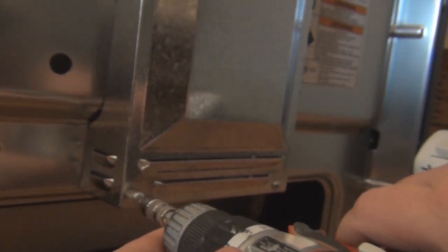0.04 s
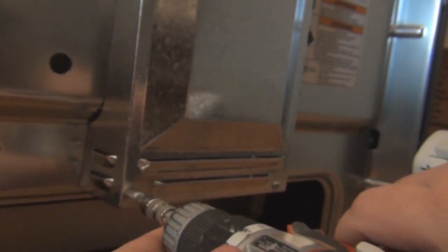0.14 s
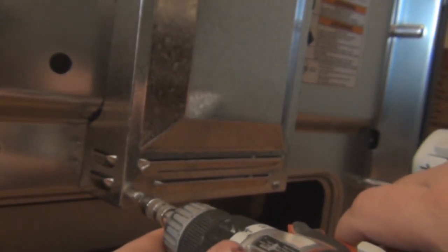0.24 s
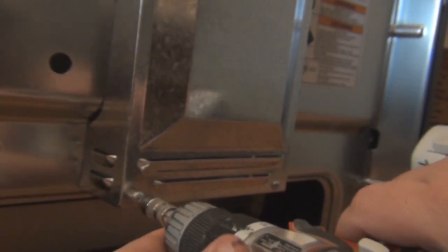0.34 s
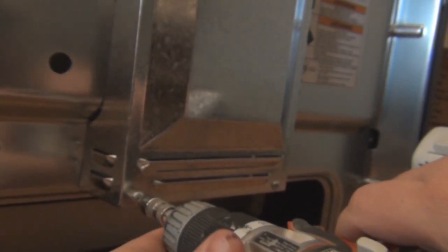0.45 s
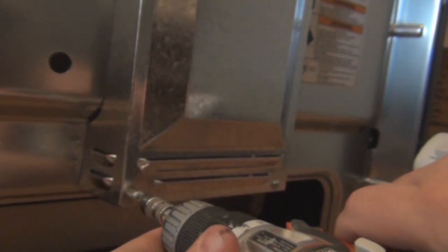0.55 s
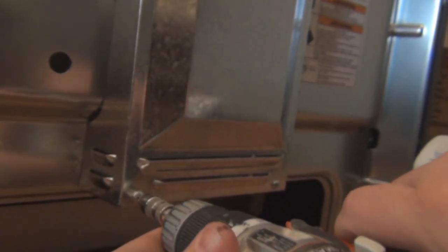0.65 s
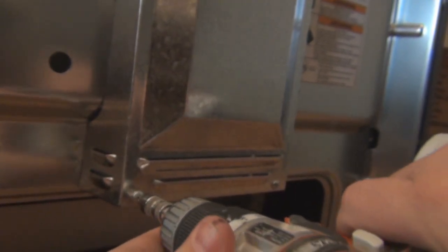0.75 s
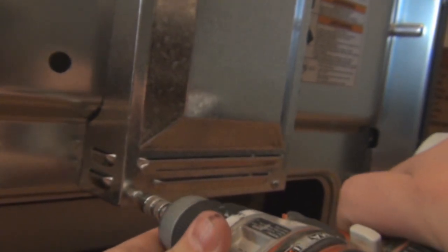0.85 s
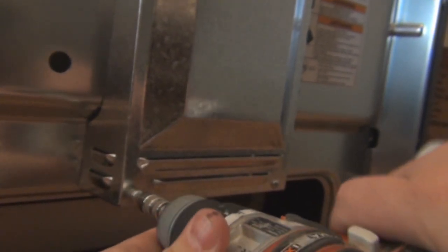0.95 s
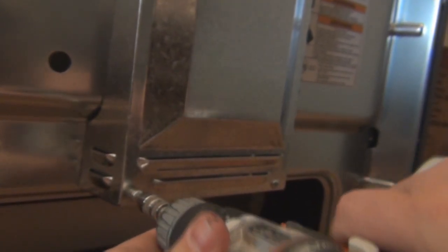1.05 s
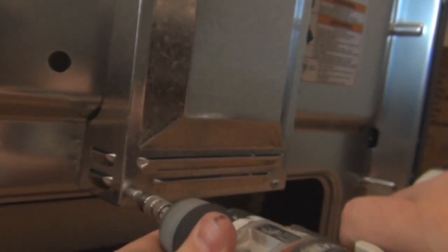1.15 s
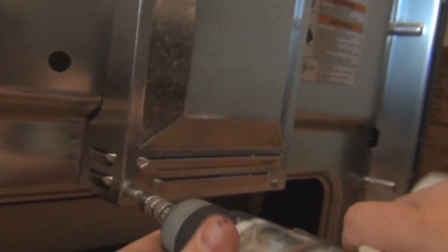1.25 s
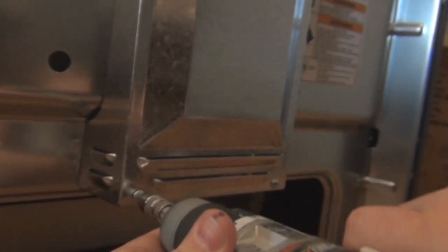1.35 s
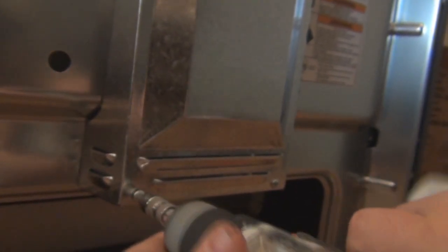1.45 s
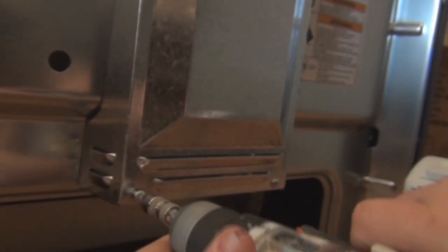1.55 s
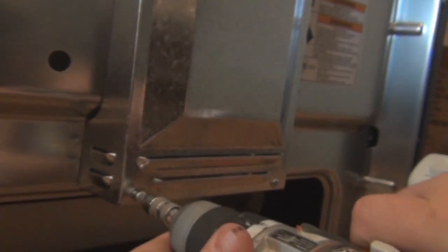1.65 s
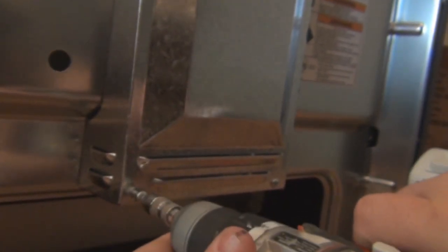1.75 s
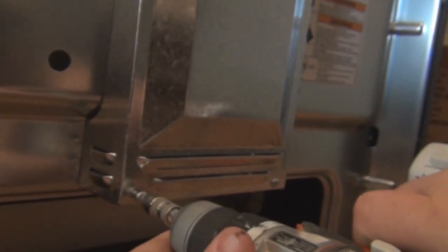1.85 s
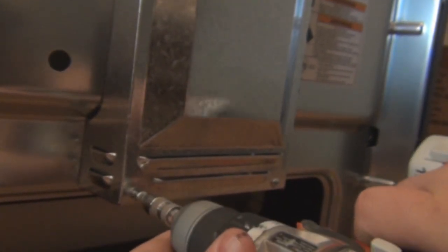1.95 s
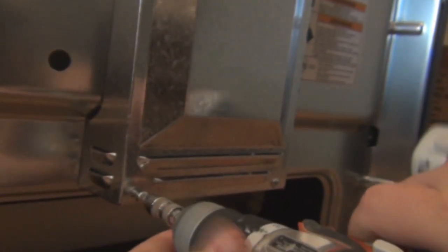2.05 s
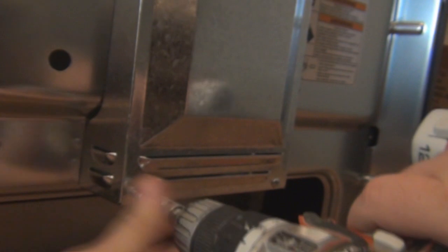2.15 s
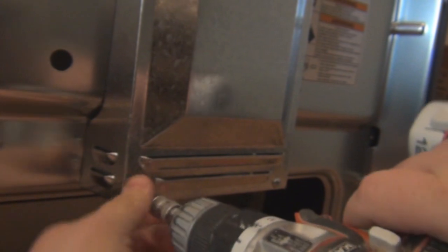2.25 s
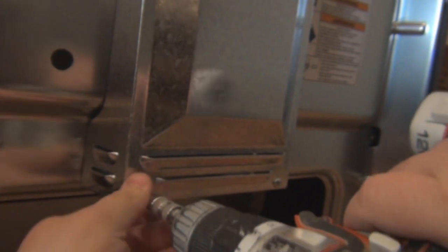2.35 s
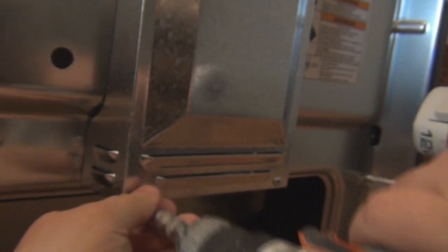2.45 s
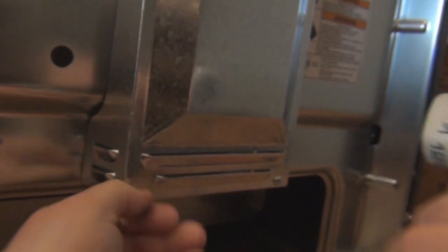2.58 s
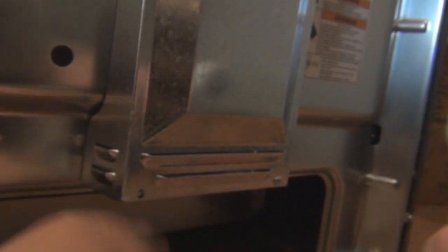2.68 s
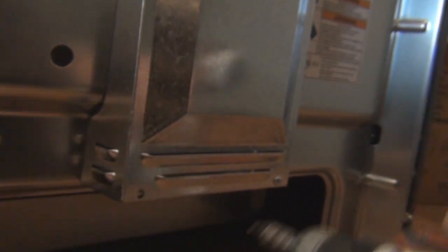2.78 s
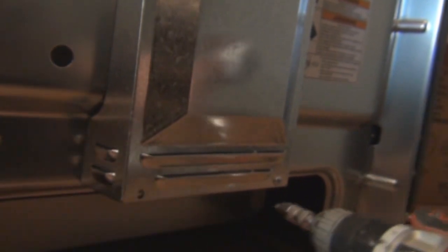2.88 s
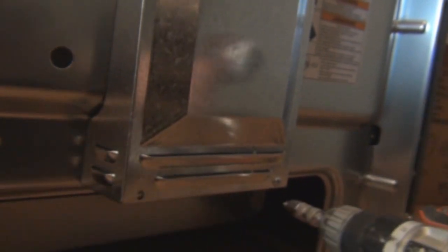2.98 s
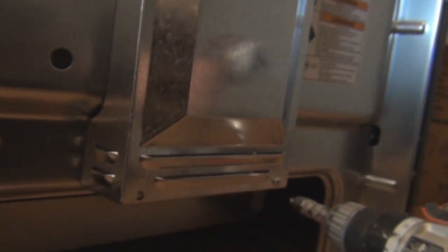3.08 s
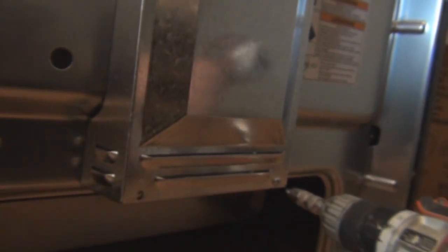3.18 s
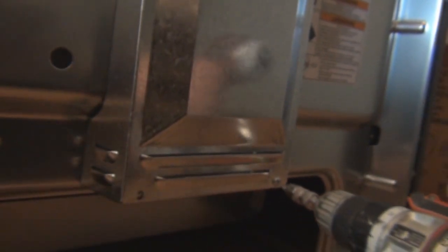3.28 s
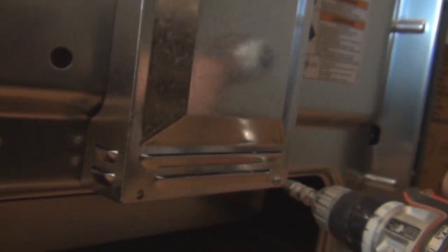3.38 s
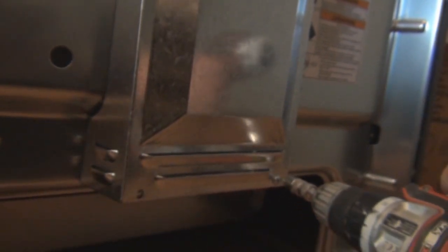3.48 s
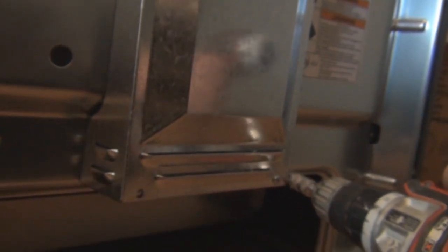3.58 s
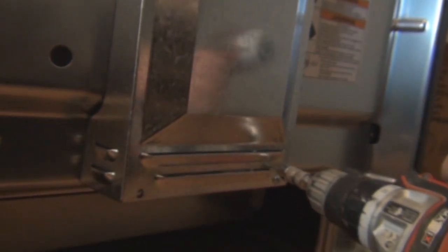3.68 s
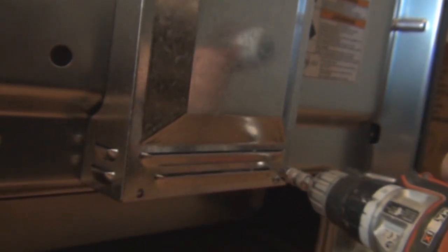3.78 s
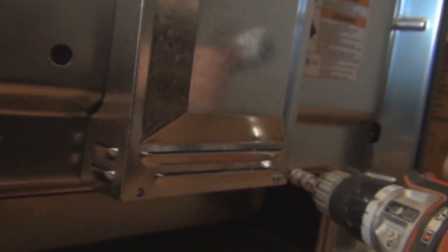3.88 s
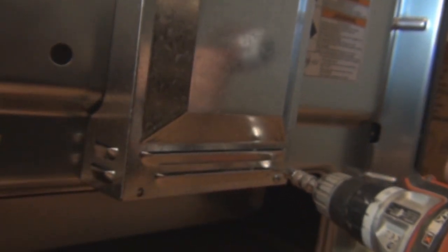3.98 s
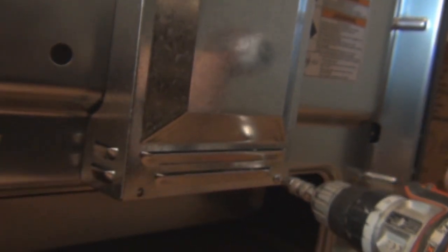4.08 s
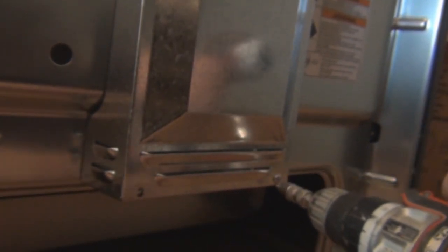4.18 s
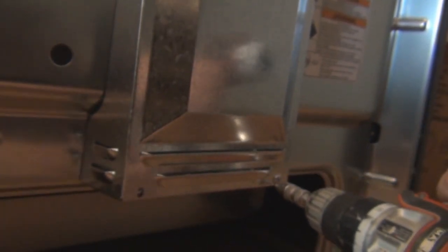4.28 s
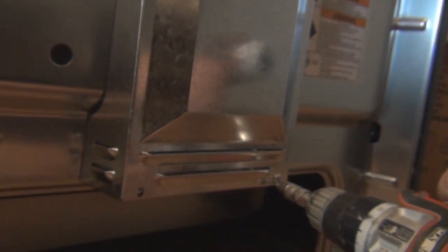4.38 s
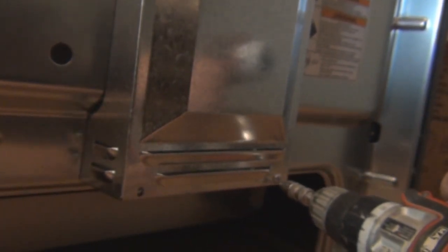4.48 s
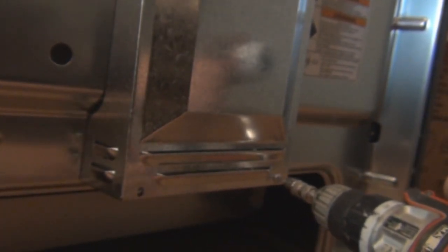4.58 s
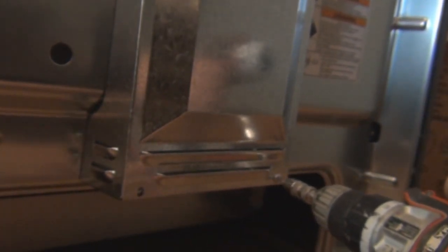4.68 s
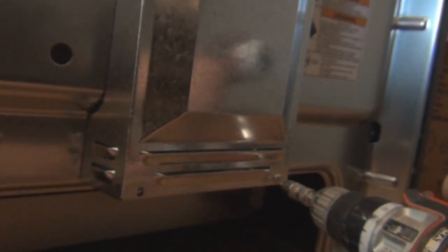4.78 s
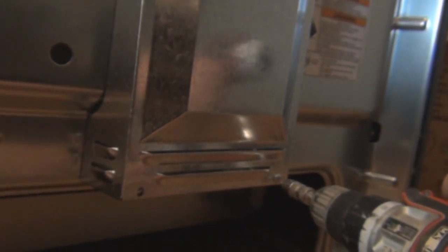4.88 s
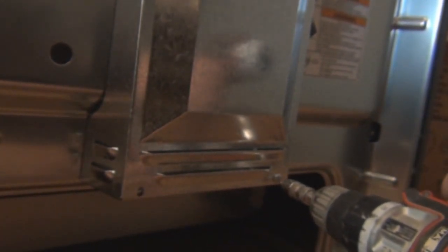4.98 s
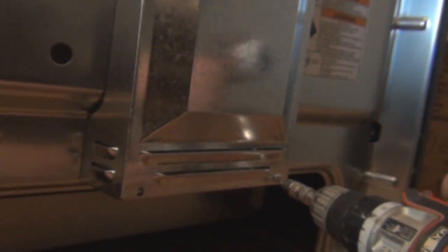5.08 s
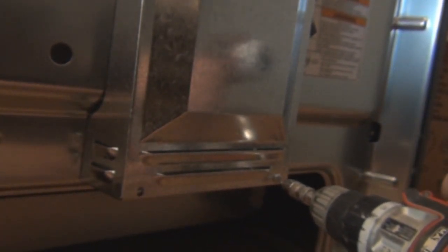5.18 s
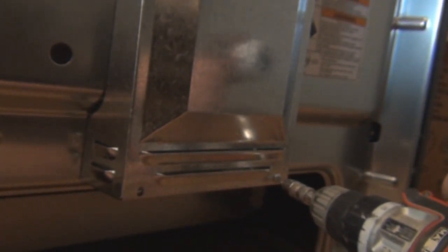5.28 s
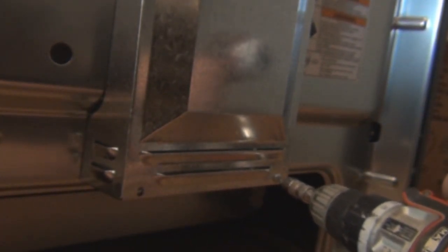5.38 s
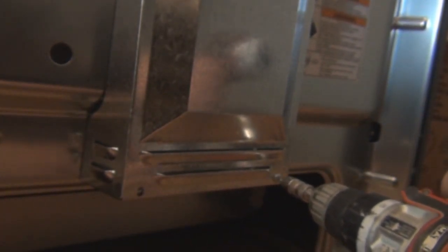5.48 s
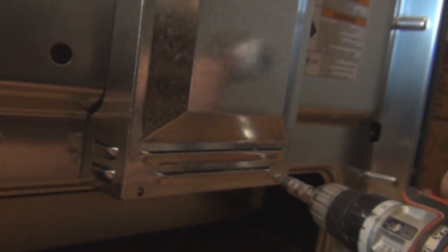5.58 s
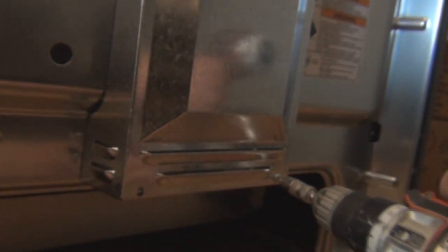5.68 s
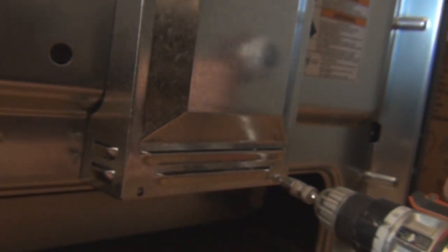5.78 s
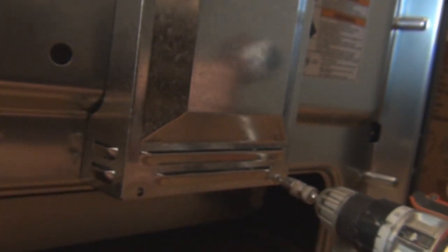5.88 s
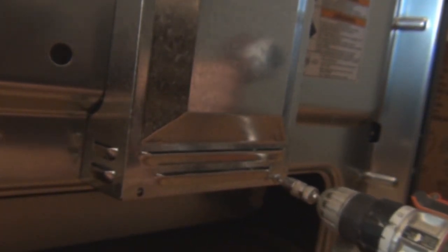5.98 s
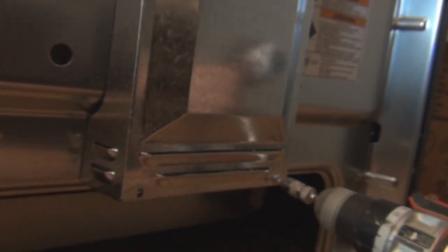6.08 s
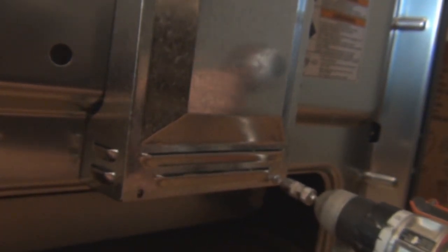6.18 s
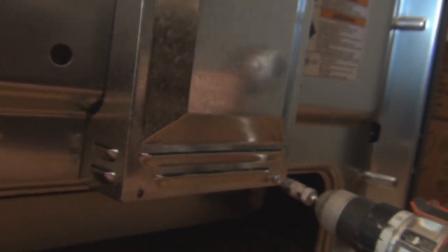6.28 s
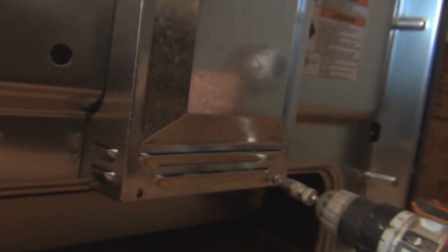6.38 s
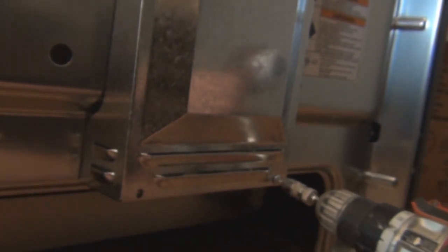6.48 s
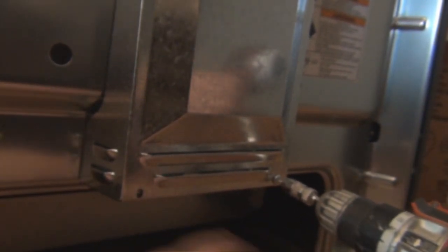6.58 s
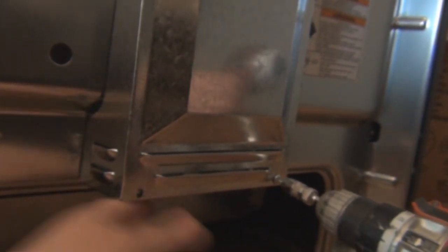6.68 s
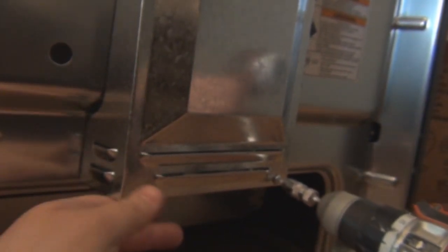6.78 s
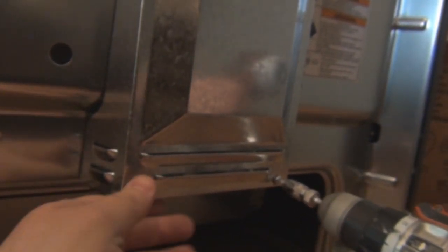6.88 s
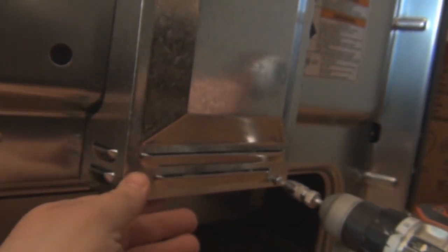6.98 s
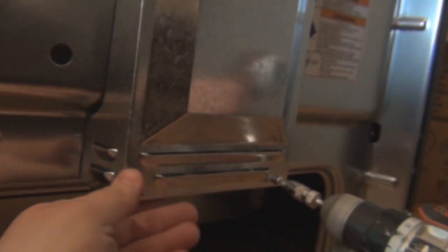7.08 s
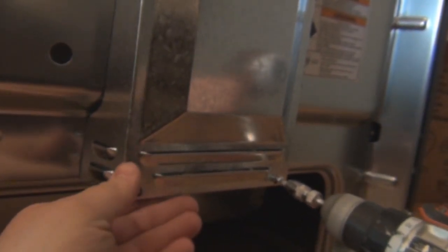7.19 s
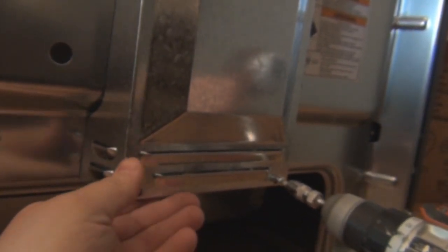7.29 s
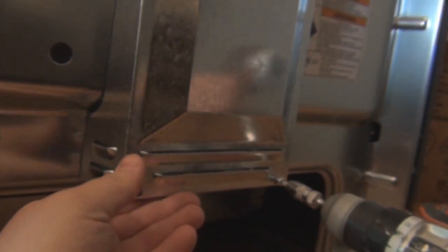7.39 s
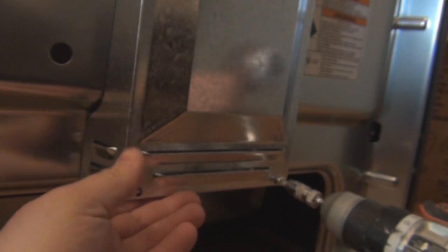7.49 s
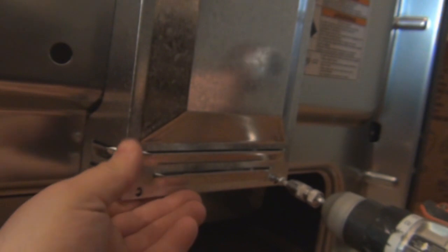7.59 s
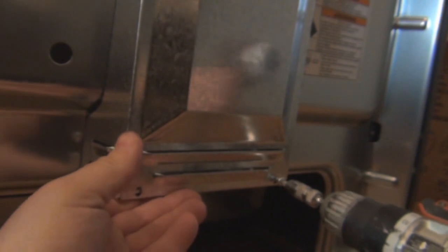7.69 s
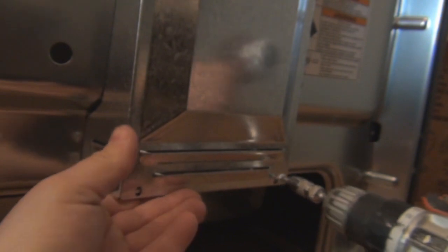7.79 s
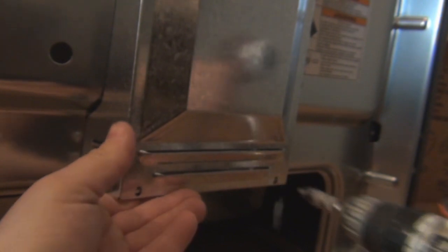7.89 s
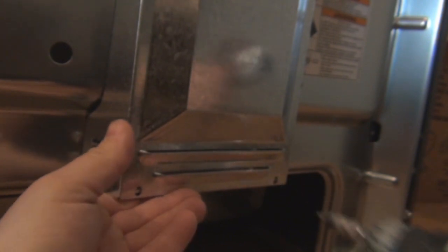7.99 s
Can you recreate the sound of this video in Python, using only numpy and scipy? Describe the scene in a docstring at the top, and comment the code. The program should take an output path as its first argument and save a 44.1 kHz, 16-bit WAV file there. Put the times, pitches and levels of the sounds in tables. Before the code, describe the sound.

A quiet room with soft air noise and low hum, microphone close to the work. Faint ticks and small scrapes until 0.9 s, then a crisp trigger click, a thin high whistle and a brief drill whir at 1.0. At 1.26 another click and a full run: bright gear rattle and rising whine, housing growl, a rough binding squeal around 1.3-1.7, metallic knocks, and a braking jolt at 2.2. A metal slide at 2.35, steel chinks at 2.6, tiny ticks at 2.7, a soft bump at 3.0. Chuck ratchet cracks at 3.3-3.45, hard tinny knocks at 3.5-3.7, strong scrapes at 3.75-4.2. Sparse taps and a scrape follow, with bright knocks at 5.0 and 5.6. A click and faint whistle at 6.15 begin a short whir to 6.5; a slide at 6.7, then a long whining run from 6.86, knocks at 7.5-7.6, slowing to a stop by 7.9 with a final scrape.

```python
"""In a quiet humming room, close to the microphone, a cordless drill backs screws out of a sheet-metal cover.
Each of four runs has a trigger click, twice a thin whistle, then gear noise and mesh tones that follow
a modelled motor speed; the first screw binds and squeals.
Around the runs, shaped noise and damped modes make knocks, small ticks, chinks, ratchet cracks and a soft
bump; swelling noise makes metal slides, and the cover's resonances boom."""
import sys
import numpy as np
from scipy import signal
from scipy.fft import rfft, irfft, next_fast_len
from scipy.io import wavfile
from scipy.ndimage import map_coordinates

SR = 44100
rng = np.random.default_rng(int(sys.argv[2]) if len(sys.argv) > 2 else 0)


def generate_wav(sig):
    """Save sig (samples, or channels by samples) to the path in sys.argv[1] as 16-bit PCM at SR."""
    pcm = np.round(np.clip(np.atleast_2d(sig).T, -1, 1) * 32767).astype(np.int16)
    wavfile.write(sys.argv[1], SR, pcm)


N = 354740  # samples
TIME = np.arange(N) / SR  # seconds


def amp(db):
    """Decibels to gain."""
    return 10 ** (np.asarray(db) / 20)


def unit(x):
    """x at rms 1."""
    return x / np.sqrt(np.mean(x ** 2) + 1e-20)


def along(points, hz):
    """(f/Hz, value) points read on a log frequency axis."""
    f, value = np.transpose(points)
    return np.interp(np.log(hz + 1), np.log(f + 1), value)


def wobble(rate):
    """A smooth random curve with this many knots a second."""
    knots = rng.standard_normal(int(N * rate / SR) + 4)
    return map_coordinates(knots, [np.arange(N) * rate / SR])


def filtered(x, response):
    """x times a response of frequency, padded so the end does not wrap round."""
    n = x.shape[-1]
    padded = next_fast_len(n + 8192)
    spectrum = rfft(x, padded) * response(np.fft.rfftfreq(padded, 1 / SR))
    return irfft(spectrum, padded)[..., :n]


def coloured(x, spectrum):
    """x shaped by a spectrum, at rms 1."""
    return unit(filtered(x, lambda hz: amp(along(spectrum, hz))))


def noise(spectrum, size=N):
    """Noise of rms 1 with a spectrum."""
    return coloured(rng.standard_normal(size), spectrum)


def swell(start, peak, end):
    """A rounded rise and fall between three times."""
    return np.interp(TIME, [start, peak, end], [0, 1, 0]) ** 2.16


def fade(t, t60):
    """Exponential decay that falls 60 dB in t60 seconds."""
    return amp(-60 * t / t60)


def bell(hz, centre, width):
    """A resonance peak of height 1."""
    return 1 / (1 + (2 * (hz - centre) / width) ** 2)


def add(track, s, sound):
    """Mix a sound into the track at time s."""
    part = track[max(round(s * SR), 0):][:len(sound)]
    part += sound[:len(part)]


def ring(modes, t):
    """Damped modes with new strengths and phases at each blow, starting at about rms 1."""
    hz, db, t60 = np.transpose(modes)[:, :, None]
    gain = amp(db + rng.normal(0, 3, hz.shape))
    waves = np.sin(2 * np.pi * (hz * t + rng.random(hz.shape))) * fade(t, np.clip(t60, .03, 1.2))
    return np.sqrt(2) * np.sum(gain * waves, axis=0) / np.linalg.norm(gain)


def echoes(x, t60):
    """A dense, short answer of nearby metal, about as loud as x."""
    t = np.arange(SR // 8) / SR
    tail = rng.standard_normal(len(t)) * fade(t, t60)
    return signal.fftconvolve(x, tail / np.linalg.norm(tail))[:N]


# resonances of the cover: (f/Hz, width/Hz, level/dB)
COVER_MODES = [(139.6, 146, 5.5), (415, 6.5, 3), (730, 750, 2), (1200, 35, 0.5), (1362, 24.7, 6.5),
               (1742, 12, 6.5), (2190, 24, -26), (2470, 26, -0.5)]


def through_cover(x, plain_db):
    """The cover's band-pass resonances on top of a flat response, at rms 1."""
    def response(f):
        modes = sum(amp(db) * 1j * f * width / (centre ** 2 - f ** 2 + 1j * f * width)
                    for centre, width, db in COVER_MODES)
        return modes + amp(plain_db)
    return unit(filtered(x, response))


# spectrum of the room's air: (f/Hz, relative level/dB per Hz)
AIR_SPECTRUM = [(15, -42), (25, -23), (137, 3.5), (206, -6), (263, 2), (416, -9.5), (503, -8), (575, -8),
                (818, -5), (887, -6), (1020, -7), (2110, -15.5), (3720, -17), (9840, -20.5), (16000, -27.5)]
# steady tones of the room, before panning: (f/Hz, level/dB)
HUM_TONES = [(54.8, -59), (501, -73.5), (888, -69.5), (15735, -72)]


def room():
    """Soft air noise, partly different in each channel, and steady tones that are stronger on the right."""
    hum = sum(amp(db) * unit(np.sin(2 * np.pi * hz * TIME + .2 * wobble(8.2))) for hz, db in HUM_TONES)
    wide = np.array([noise(AIR_SPECTRUM), noise(AIR_SPECTRUM)])
    air = noise(AIR_SPECTRUM) + amp(-13) * wide
    return amp(-54 + 1.8 * wobble(3.91)) * air + hum * amp([[-4], [2.5]])


DUCK_DB, DUCK_S = -22.5, 0.7  # level where the room starts to sink; time constant of the level detector


def ducking(x):
    """Gain control: the room's gain sinks while x is loud and recovers slowly."""
    step = 1 / (DUCK_S * SR)
    power = signal.lfilter([step], [1, step - 1], x ** 2)
    return 1 / np.sqrt(1 + power / amp(DUCK_DB) ** 2)


# strokes of bit and fingers over metal: (start t/s, peak t/s, end t/s, level/dB)
SLIDE_STROKES = [(0.06, 0.087, 0.18, -49), (0.256, 0.276, 0.39, -39.5), (.66, 0.702, 1.8, -54.5),
                 (2.29, 2.361, 2.68, -33), (2.6, 2.65, 2.9, -45), (3.02, 3.102, 3.22, -55),
                 (3.716, 3.761, 3.89, -30.5), (3.907, 3.992, 4.233, -31.5), (4.6, 4.666, 4.88, -39),
                 (6.666, 6.723, 7.05, -42), (7.87, 7.947, 8.05, -31.5)]
# spectrum of the sliding: (f/Hz, relative level/dB per Hz)
SLIDE_SPECTRUM = [(59, -36), (100, -17.5), (172, -6), (582, -17), (831, -9.5), (1020, -20), (1160, -10),
                  (2580, -17.5), (7200, -10.5), (8700, -7.5), (10100, -23), (15000, -31)]


def slides():
    """Metal slides over metal in fine uneven catches, which make it ring."""
    stroke = sum(amp(db) * swell(start, peak, end) for start, peak, end, db in SLIDE_STROKES)
    catches = noise(SLIDE_SPECTRUM) * amp(1.9 * wobble(180))
    ringing = echoes(catches, t60=.08)
    return stroke * through_cover(0.33 * catches + ringing, plain_db=-12.5)


# dry clicks of trigger and switch, and two small ticks of the loosened screw (near 2.7 s):
# (t/s, relative level/dB, snap tone's relative level/dB)
CLICK_EVENTS = [(0.1384, -28, -6), (0.7657, -34, 6), (0.8728, -22.5, -10), (0.919, -25.5, -16),
                (0.935, -3.5, -6.5), (1.0007, -4.5, 3), (1.2457, -8, -22), (1.265, -4.5, 4),
                (2.6757, -18.5, -24), (2.7058, -20, -24), (5.837, -24.5, -5), (5.9356, -20, 0.5),
                (6.141, -7, -18), (6.7521, -18, -4), (6.8176, -27, -6), (6.8524, -13.5, -22)]
# spectrum of the dry crack: (f/Hz, relative level/dB per Hz)
CRACK_SPECTRUM = [(240, -36), (400, 2), (1390, 1.5), (1910, -3), (3100, 0.5), (4740, -1.5), (5430, -9),
                  (7810, 2), (11600, -22.5), (15000, -30)]


def clicks():
    """Small parts snap or tick drily: a noise crack with a faint tail and a very short tone."""
    out, t = np.zeros(N), np.arange(SR // 10) / SR
    for s, db, snap_db in CLICK_EVENTS:
        crack = noise(CRACK_SPECTRUM, size=len(t)) * (fade(t, 0.023) + amp(-17.5) * fade(t, 0.42))
        snap_hz = 1950 * rng.normal(1, 0.06)
        snap = amp(snap_db + 9) * np.sin(2 * np.pi * snap_hz * t) * fade(t, 0.01)
        onset = 1 - fade(t, 0.0025)
        add(out, s, amp(db - 12) * (crack + snap) * onset)
    return out


# knocks of bit, screw and hand on the cover, all levels relative:
# (t/s, strength level/dB, hardness level/dB of steel, weight level/dB of boom)
KNOCK_EVENTS = [(0.266, -36.5, -2.5, -1), (0.3412, -38, -2.5, 4), (0.6653, -44.5, 0, -3),
                (1.0759, -21, 4, -3), (1.6545, -20.5, 3, -14), (1.965, -18, 1, -11.5),
                (2.1002, -26.5, -11, -6), (2.39, -24.5, 10, -6), (2.585, -34, 10, -18),
                (3.5277, -14.5, 3.5, -12), (3.6143, -19, -5, -22), (3.6697, -13, -0.5, -9.5),
                (3.873, -27.5, 14.5, -3.5), (4.4997, -29, 12.5, -9.5), (5.01, -19, -3, -11),
                (5.5577, -37, -11, 1), (5.5927, -23.5, -12, -9.5), (5.6906, -20, -3, -8.5),
                (6.1069, -36.5, 2, 1), (6.2575, -20, 1, -3.5), (6.3041, -14.5, -6, -5.5),
                (7.5001, -23.5, 6, -4), (7.6304, -24, 11.5, -3), (7.9297, -48, 24, 7.5)]
# spectrum of the steel tick: (f/Hz, relative level/dB per Hz)
TICK_SPECTRUM = [(1470, -32), (2500, -6), (2710, -13), (2970, -7.5), (3880, -7.5), (5130, -3), (6120, -2.5),
                 (7260, -0.5), (9000, -19.5), (11700, -34.5), (19800, -120)]
# spectrum of the bright steel ping: (f/Hz, relative level/dB per Hz)
PING_SPECTRUM = [(5000, -36.5), (7300, -3), (8400, 6), (9300, -7.5), (10300, -8.5), (13000, -20.5),
                 (16000, -35)]
# spectrum of the sheet's clang: (f/Hz, relative level/dB per Hz)
CLANG_SPECTRUM = [(210, -30.5), (350, -4.5), (554, -9), (632, -1.5), (775, 1), (1090, -2), (1200, -2.5),
                  (1750, -5), (2350, -10), (2550, -15.5), (4000, -17.5), (5200, -52), (8800, -120)]
# spectrum of the cover's boom: (f/Hz, relative level/dB per Hz)
BOOM_SPECTRUM = [(35, -55.5), (60, -39.5), (100, -2.5), (129, 4.5), (162, 7), (383, -0.5), (450, -8),
                 (580, -4.5), (990, -120)]
# ring of bit and screw, before the overall fade: (f/Hz, relative level/dB, t60/s)
STEEL_MODES = [(3026, -0.5, 0.41), (4350, -6.5, 0.71), (4940, -0.5, 0.45), (5070, 3, 0.17), (6700, 4, 0.29),
               (7400, -3.5, 0.27), (7327, 4.5, 0.24), (7000, 1, 0.29), (7440, -16.5, 0.27),
               (8800, -15.5, 0.29), (8550, -53, 0.32), (9240, 10, 0.19)]
# ring of the cover, before the overall fade: (f/Hz, relative level/dB, t60/s)
SHEET_MODES = [(142.8, 3, 0.2), (247, -10, 0.51), (475, -4, 0.82), (658, -3, 1), (742, -7, 1),
               (833, -8, 0.29), (1044, -21, 0.11), (1260, 5, 0.23), (1500, -19, 0.5), (1540, -1.5, 0.23),
               (1636, 1, 0.33), (1930, -20.5, 0.375), (2118, -5.5, 0.49), (2230, -13, 0.44),
               (2326, -24.5, 0.32), (2430, -6.5, 0.39), (2420, -13.5, 0.42), (2920, -20, 0.238),
               (3192, -13, 0.25), (3540, -16.5, 0.67)]


def knocks():
    """A knock is a steel tick and ping, a clang of the sheet and a slower boom of the whole cover."""
    out, t = np.zeros(N), np.arange(SR * 3 // 4) / SR
    for s, db, hard_db, weight_db in KNOCK_EVENTS:
        tick = noise(TICK_SPECTRUM, size=len(t)) * (fade(t, 0.18) + amp(-26) * fade(t, 0.75))
        tick += .6 * ring(STEEL_MODES, t) * fade(t, .5)
        ping = noise(PING_SPECTRUM, size=len(t)) * (fade(t, 0.14) + amp(-20.5) * fade(t, 0.4))
        steel = amp(-11.5) * tick + amp(-14.5) * ping
        clang = through_cover(noise(CLANG_SPECTRUM, size=len(t)), plain_db=-1.5)
        clang *= fade(t, 0.2) + amp(-16) * fade(t, 0.97)
        clang += .75 * ring(SHEET_MODES, t) * fade(t, 1)
        boom = through_cover(noise(BOOM_SPECTRUM, size=len(t)), plain_db=8.5)
        boom *= (fade(t, 0.12) + amp(-9) * fade(t, 1.47)) * (1 - fade(t, 0.037))
        blow = amp(hard_db) * steel + amp(-3.5) * clang + amp(weight_db) * boom
        add(out, s, amp(db) * blow * (1 - fade(t, 0.0041)))
    return out


# swells of the speed controller's whistle: (start t/s, peak t/s, end t/s, level/dB)
WHISTLE_SWELLS = [(0.93, 0.983, 1.07, -19), (6.158, 6.161, 6.2, -30)]
# its harmonics: (f/Hz, relative level/dB)
WHISTLE_HARMONICS = [(3872, -11.5), (7744, 6), (11616, -20)]


def whistle():
    """The switched current sings in the stalled windings: three harmonics with a slight time jitter."""
    t = TIME + 8e-6 * wobble(58.6)
    tone = sum(amp(db) * np.sin(2 * np.pi * hz * t) for hz, db in WHISTLE_HARMONICS)
    return unit(tone) * sum(amp(db) * swell(start, peak, end) for start, peak, end, db in WHISTLE_SWELLS)


# pulls of the trigger: (start t/s, attack t/s, release t/s, coasting t/s, trigger depth 0-1, then relative
# level/dB of gear rattle, housing growl, whine and brake jolt)
TRIGGER_PULLS = [(1.0, .035, 1.15, .095, .65, -18, -29, -37, -45),
                 (1.264, .024, 2.216, .17, 1, -18.6, -29.6, -32, -23.5),
                 (6.152, .066, 6.44, .25, .8, -21.2, -27, -38, -45),
                 (6.862, .044, 7.797, .15, 1, -21, -28.3, -27.5, -22.5)]
FULL_SPEED, SPIN_UP_S = 298, .103  # free-running motor (turns per second) and its time constant
BIND_FROM_S, BIND_TO_S, BIND_LOSS = 1.39, 1.595, .31  # binding takes this share of the drive
EASE_FROM_S, EASE_PER_S = 7.55, .88  # the finger eases off: share of the speed lost per second


def motor():
    """Speed (turns per second) and torque (0-1): the motor lags the trigger, slows under load and coasts."""
    load = 1 - BIND_LOSS * ((TIME > BIND_FROM_S) & (TIME < BIND_TO_S))
    ease = 1 - EASE_PER_S * np.maximum(TIME - EASE_FROM_S, 0)
    step = 1 / (SPIN_UP_S * SR)
    speed, torque = np.zeros((2, N))
    for start, _, release, coast_s, depth, *_ in TRIGGER_PULLS:
        spin = signal.lfilter([step], [1, step - 1], (TIME >= start) * depth * load)
        turning = (TIME >= start) * np.clip(1 - (TIME - release) / coast_s, 0, 1) ** 2
        speed += FULL_SPEED * spin * ease * turning
        torque += (1 - spin) * turning
    return speed, torque


COAST_DB, COAST_SHAPE = 26, 1.67  # fall in level over the coasting time, slow at first
JOLT_PEAK_S, JOLT_END_S = .024, .085  # the brake's jolt, counted from the release


def pull_gains():
    """Gains of rattle, growl, whine and brake jolt: each pull rises, holds and dies away."""
    rattle, growl, whine, jolt = np.zeros((4, N))
    for start, attack_s, release, coast_s, _, rattle_db, growl_db, whine_db, jolt_db in TRIGGER_PULLS:
        coasted = np.maximum(TIME - release, 0) / coast_s
        attack = np.clip((TIME - start) / attack_s, 0, 1) ** 2
        on = attack * amp(-COAST_DB * coasted ** COAST_SHAPE)
        rattle += on * amp(rattle_db)
        growl += on * amp(growl_db)
        whine += on * amp(whine_db)
        jolt += amp(jolt_db) * swell(release, release + JOLT_PEAK_S, release + JOLT_END_S)
    return rattle, growl, whine, jolt


def gear_chatter(speed, turns):
    """Teeth strike unevenly, 15 a turn, over rough noise and a repeating wear pattern, with short echoes."""
    # hardest once a turn and at each of the three poles
    throb_db = 1.1 * np.sin(2 * np.pi * turns) + 1.4 * np.sin(2 * np.pi * 3 * turns) + .4 * wobble(70)
    teeth = np.diff(np.floor(15 * turns), prepend=0) * rng.standard_normal(N)
    chatter = amp(throb_db) * (unit(teeth) + 1.8 * rng.standard_normal(N))
    # worn teeth repeat their pattern every three turns: fine lines that follow the speed
    wear = map_coordinates(rng.standard_normal(450), [150 * turns % 450], mode="grid-wrap")
    chatter = unit(chatter) + .4 * wear * np.clip(speed / 200, 0, 1)
    return chatter + .35 * echoes(chatter, t60=.03)


# spectrum of the gear rattle, also tilts the whine: (f/Hz, relative level/dB per Hz)
GEAR_SPECTRUM = [(1180, -73), (2000, -20.5), (2620, -26), (2880, -5), (3740, -6), (4260, -5), (4610, -5.5),
                 (5070, -3), (5630, -5.5), (6940, 0.5), (8050, 1.5), (10300, -13.5), (12900, -22.5),
                 (14500, -26), (16000, -37.5)]
# gearbox resonances: (f/Hz, width/Hz, level/dB)
GEARBOX_MODES = [(4200, 600, 5), (7200, 450, 8), (8050, 400, 3)]
# gear-mesh whine: (multiple of the motor speed, relative level/dB)
WHINE_ORDERS = [(10, -14), (12, -14), (15, -3), (17, -10), (21, -15), (23, -17), (24, -5), (27, -5),
                (29, -9), (30, -5), (33, -10), (39, -6)]


def mesh_whine(speed, turns):
    """Gear-mesh tones follow the motor and swell as they sweep through the gearbox's resonances."""
    whine = np.zeros(N)
    for order, db in WHINE_ORDERS:
        hz = order * speed
        lift_db = .8 * along(GEAR_SPECTRUM, np.maximum(hz, 2500))
        lift_db += sum(peak_db * bell(hz, centre, width) for centre, width, peak_db in GEARBOX_MODES)
        gain = amp(db + lift_db + 2 * wobble(10))
        whine += gain * np.sin(2 * np.pi * order * turns + .25 * wobble(120))
    return whine


# torque ripple of the three-pole motor: (multiple of the motor speed, relative level/dB)
RIPPLE_ORDERS = [(1, -6), (3, 0), (5, -8), (6, -3)]
# how well the housing radiates it: (f/Hz, level/dB)
HOUSING_RADIATION = [(150, -6), (290, 0), (450, -7), (620, -2), (870, 3), (1200, 1), (1800, 0)]


def torque_ripple(speed, turns):
    """Low tones of the motor's uneven torque, radiated by the housing and weak at low speed."""
    ripple = np.zeros(N)
    for order, db in RIPPLE_ORDERS:
        gain = amp(db + along(HOUSING_RADIATION, order * speed) + 3 * wobble(25))
        ripple += gain * np.sin(2 * np.pi * order * turns + .4 * wobble(90))
    return ripple * np.clip(speed / 180, 0, 1) ** 2


# spectrum of the housing's growl: (f/Hz, relative level/dB per Hz)
HOUSING_SPECTRUM = [(47, -71), (80, -28), (184, -3.5), (230, -13), (279, -3), (359, -6.5), (405, -19),
                    (456, -2), (692, -5.5), (852, 4), (1000, -3.5), (1820, 5), (2380, -2.5), (2800, -3.5),
                    (3640, -40.5), (6160, -120)]
RATTLE_DB, GROWL_DB = -2.99, -1.2  # trims of gears and housing
RATTLE_LOAD_DB, GROWL_LOAD_DB = 5.5, 7.5  # rise at full torque
RIPPLE_DB, RIPPLE_LOAD_DB = -9, 27  # ripple against the whine, and its rise at full torque


def drill():
    """Gear teeth rattle and whine at the motor's speed; the housing growls and shakes the cover."""
    speed, torque = motor()
    turns = np.cumsum(speed * (1 + .001 * wobble(45))) / SR
    rattle_gain, growl_gain, whine_gain, jolt_gain = pull_gains()
    rattle_gain = rattle_gain * amp(RATTLE_DB + RATTLE_LOAD_DB * torque)
    growl_gain = growl_gain * amp(GROWL_DB + GROWL_LOAD_DB * torque)
    chatter = gear_chatter(speed, turns)
    rattle = coloured(chatter, GEAR_SPECTRUM)
    growl = through_cover(coloured(chatter, HOUSING_SPECTRUM), plain_db=9)
    ripple = torque_ripple(speed, turns)
    ripple_gain = amp(RIPPLE_DB + RIPPLE_LOAD_DB * torque)
    tones = whine_gain * (mesh_whine(speed, turns) + ripple_gain * ripple)
    housing = growl_gain * growl + jolt_gain * (growl + ripple)
    return rattle_gain * rattle + tones + housing


# chatter of the binding screw: (multiple of the motor speed, relative level/dB)
SQUEAL_PARTIALS = [(7, -3), (8, -9), (9, -5), (14, 0), (15, -3), (21, -1), (24, 1)]
SQUEAL_HZ, SQUEAL_WIDTH_HZ, SQUEAL_LIFT_DB = 1490, 250, 15.5  # resonance of the sheet round the hole
SQUEAL_EDGE_S = 0.14  # fades in before the screw binds and out for as long after


def squeal():
    """The binding thread sticks and slips in step with the motor, with a rough pitch, and rings the sheet."""
    speed, _ = motor()
    turns = np.cumsum(speed * (1 + .005 * wobble(150))) / SR
    inside_s = np.minimum(TIME - BIND_FROM_S, BIND_TO_S - TIME)
    on = np.clip(inside_s / SQUEAL_EDGE_S + 1, 0, 1)
    tones = np.zeros(N)
    for order, db in SQUEAL_PARTIALS:
        lift_db = SQUEAL_LIFT_DB * bell(order * speed, SQUEAL_HZ, SQUEAL_WIDTH_HZ)
        tones += amp(db + lift_db + 4.2 * wobble(40.17)) * np.sin(2 * np.pi * order * turns)
    return on * amp(-35.5) * tones


# the bit skips on the screw head: (t/s, relative level/dB)
CHINK_EVENTS = [(2.604, -24.5), (2.6231, -19.5), (5.009, -28.5), (5.5915, -17.5)]


def chinks():
    """Steel on steel: bit and screw ping and ring brightly, without the sheet."""
    out, t = np.zeros(N), np.arange(SR // 2) / SR
    for s, db in CHINK_EVENTS:
        ping = noise(PING_SPECTRUM, size=len(t)) + amp(-8.5) * noise(TICK_SPECTRUM, size=len(t))
        ping *= fade(t, 0.19) + amp(-24.5) * fade(t, 0.72)
        ringing = amp(-8) * ring(STEEL_MODES, t) * fade(t, 0.67)
        add(out, s, amp(db) * (ping + ringing) * (1 - fade(t, 0.0051)))
    return out


# a soft bump of the hand on the drill: (t/s, level/dB)
BUMP_EVENT = (3.002, -19.5)
# low modes it moves: (f/Hz, relative level/dB, t60/s)
BUMP_RING = [(92, -6, 0.13), (141, 2.5, 0.048), (185, -1.5, 0.12)]


def bump():
    """A padded blow moves only low modes, with a faint tick on top."""
    out, t = np.zeros(N), np.arange(SR // 4) / SR
    s, db = BUMP_EVENT
    thud = ring(BUMP_RING, t) * (1 - np.exp(-t / 0.006))
    tick = amp(-20) * noise(CRACK_SPECTRUM, size=len(t)) * fade(t, 0.098)
    add(out, s, amp(db) * (thud + tick))
    return out


# the chuck ratchets as the drill is lined up: (t/s, relative level/dB)
RATCHET_EVENTS = [(3.3131, -8), (3.3251, -8), (3.3737, -8), (3.4007, -14), (3.408, -9), (3.424, -21),
                  (3.4323, -13.5)]
# response of the chuck: (f/Hz, level/dB)
CHUCK_RESPONSE = [(150, -67), (250, -33), (748, -13), (1270, -18), (1430, -13.5), (2750, -14.5), (3100, -6),
                  (3500, -10), (8100, -5), (13300, -45), (15000, -66)]


def ratchet():
    """The chuck's pawl drops with a sharp noise crack and a short steely tail."""
    out, t = np.zeros(N), np.arange(SR // 5) / SR
    decay = fade(t, 0.0049) + amp(-11.5) * fade(t, 0.044) + amp(-14.5) * fade(t, 0.16)
    for s, db in RATCHET_EVENTS:
        add(out, s, amp(db + 6) * rng.standard_normal(len(t)) * decay)
    return filtered(out, lambda hz: amp(along(CHUCK_RESPONSE, hz)))


# stereo width: (f/Hz, side against mid level/dB)
SIDE_WIDTH = [(60, 7), (150, -10), (500, -25), (1300, -16), (2500, -37), (6000, -13), (9000, -13.5),
              (12000, -46)]
# stereo balance: (t/s, left minus right level/dB)
BALANCE_CURVE = [(0, 0), (1.4, -1.5), (2.2, -2), (2.6, -0.3), (3.4, 1.5), (3.7, 0), (5.6, -0.3), (6.2, 1.5),
                 (6.6, -2.5), (8, -2.5)]


def scene():
    """Reflections from the nearby metal reach the two microphone ports differently; the room is ducked."""
    mid = slides() + clicks() + knocks() + whistle() + drill() + squeal() + chinks() + bump() + ratchet()
    side = filtered(echoes(mid, t60=0.068), lambda hz: amp(along(SIDE_WIDTH, hz)))
    balance_db = np.interp(TIME, *np.transpose(BALANCE_CURVE))
    left = (mid + side) * amp(balance_db / 2)
    right = (mid - side) * amp(-balance_db / 2)
    return np.array([left, right]) + ducking(mid) * room()


TOP_HZ = 16100  # band limit


def record(dry):
    """The recorder rounds off the highest peaks and keeps nothing above its band limit."""
    rounded = dry / (1 + np.abs(dry / .62) ** 4) ** (1 / 4)
    return filtered(rounded, lambda hz: hz < TOP_HZ)


dry = scene()
out = record(dry)
generate_wav(out)
```